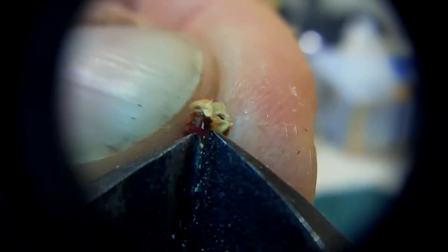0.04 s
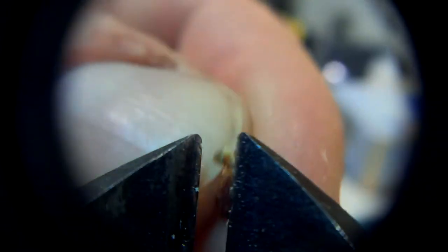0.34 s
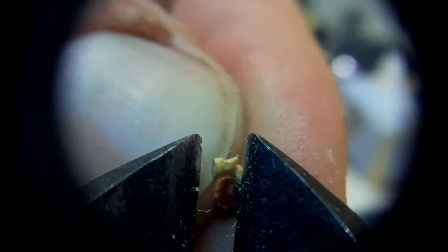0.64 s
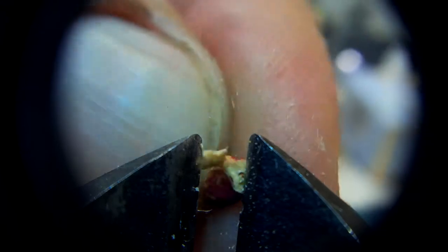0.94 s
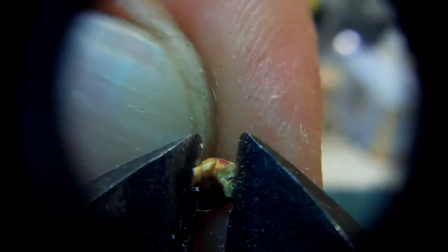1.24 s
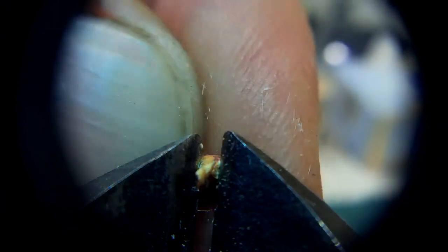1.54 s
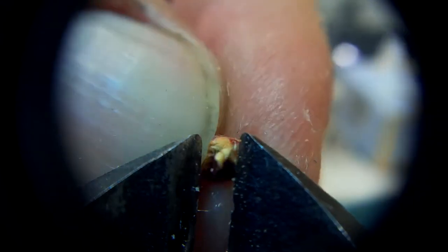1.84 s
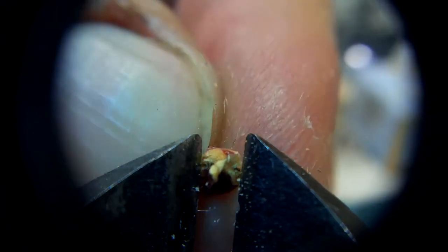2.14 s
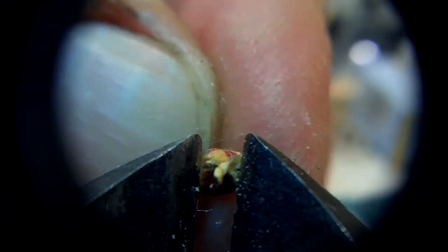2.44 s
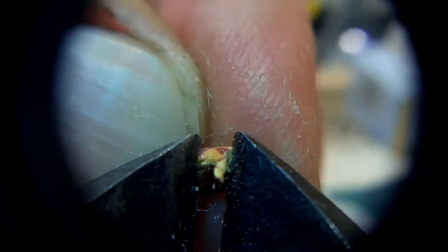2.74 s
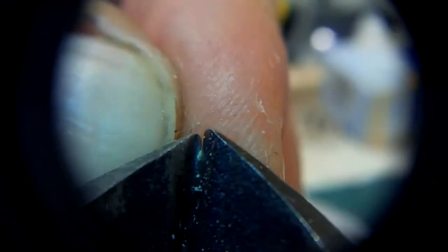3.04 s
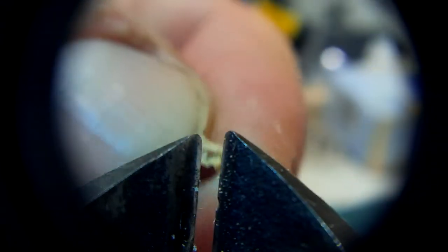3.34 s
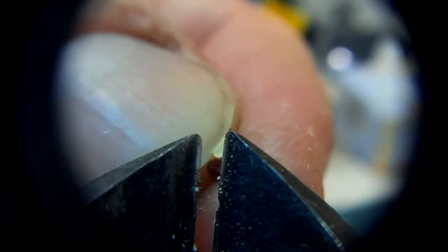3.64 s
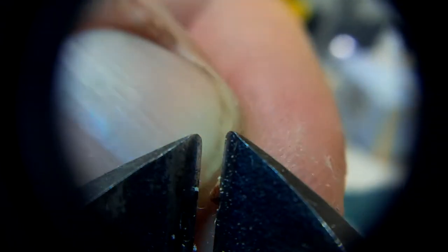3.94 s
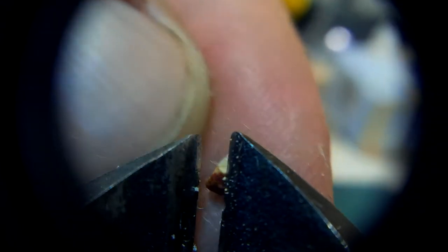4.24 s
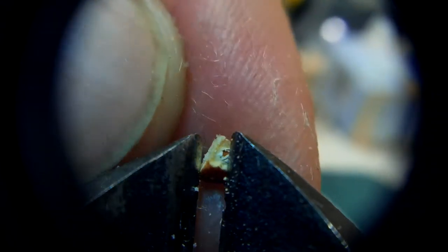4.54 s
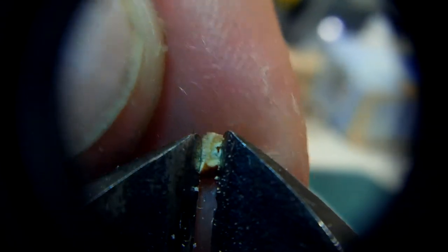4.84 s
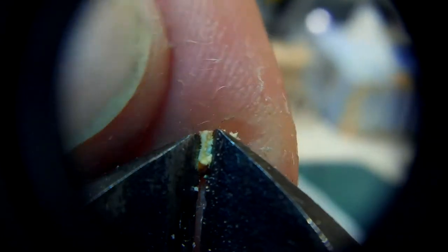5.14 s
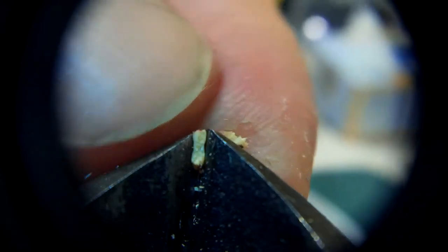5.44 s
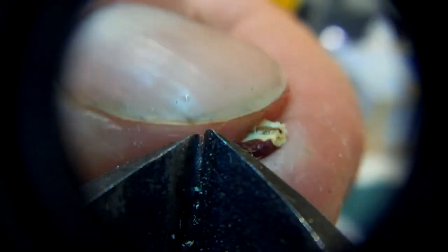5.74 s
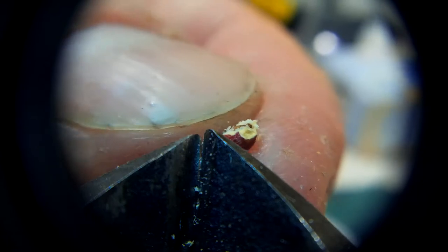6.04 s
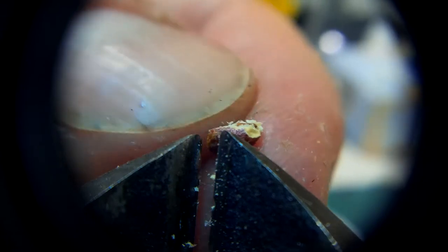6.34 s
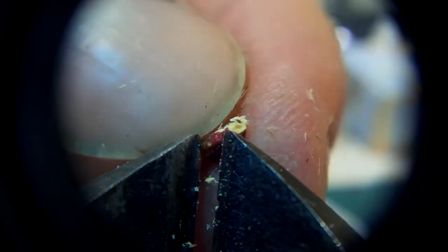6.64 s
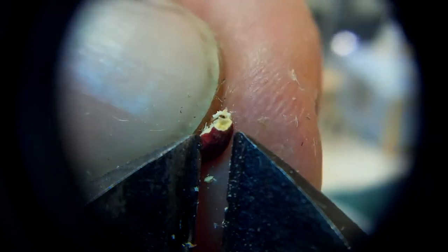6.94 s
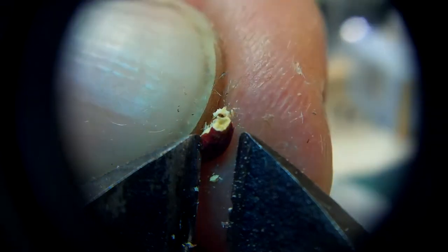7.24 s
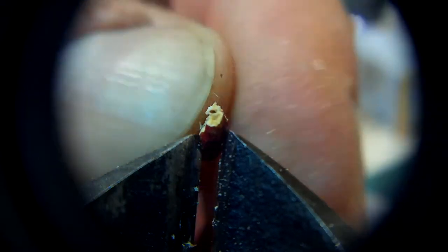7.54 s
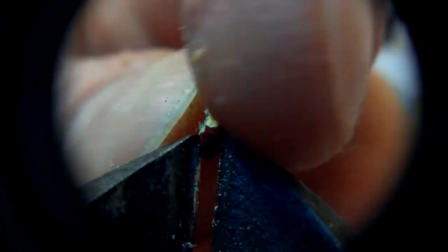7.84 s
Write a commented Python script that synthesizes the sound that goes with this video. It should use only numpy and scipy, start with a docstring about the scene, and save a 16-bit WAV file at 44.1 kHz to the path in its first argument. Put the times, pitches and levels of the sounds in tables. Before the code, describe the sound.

Small dry clicks and two sharp cracks as pliers squeeze a hard seed up close, a steady low hum underneath.

```python
"""Cracking a seed in pliers

A hard seed is cracked in steel pliers held against a small camera in a quiet room.
Each fracture of the shell rings the jaws and jolts the camera body; twice the shell gives way
and the jaws chatter. Fingers and shell scrape on the steel in between, over a steady low hum."""
import sys
import numpy as np
from scipy import signal
from scipy.fft import rfft, irfft
from scipy.io import wavfile
from scipy.ndimage import uniform_filter1d

SR = 44100
rng = np.random.default_rng(int(sys.argv[2]) if len(sys.argv) > 2 else 0)


def generate_wav(sig):
    """Save sig (samples, or channels by samples) to the path in sys.argv[1] as 16-bit PCM at SR."""
    pcm = np.round(np.clip(np.atleast_2d(sig).T, -1, 1) * 32767).astype(np.int16)
    wavfile.write(sys.argv[1], SR, pcm)


N = 355887
RING_TIME = np.arange(8192) / SR  # seconds since a hit

# single clicks of seed and jaws: (time [s], level [dB], shell pitch [Hz], bluntness [0-1],
# ring time [ratio], jolt level [dB], jolt swell [ms])
CLICKS = [ (0.165, -53, 1490, 0.9, .46, -41, 4.0), (0.5232, -46.5, 2340, 0.2, 1.6, -47, 2.6),
          (0.8992, -29, 2500, .2, 1.1, -51, 4.5), (1.6555, -31.5, 1880, 1, .8, -33.5, 2.4),
          (1.660, -43.5, 710, 1, 0.99, -60, 4), (2.8492, -27, 3380, 0.3, 1.03, -40, 3),
          (2.8572, -20, 2900, .1, 0.61, -21, 2.7), (3.011, -43.5, 1590, .15, 0.06, -67, 3),
          (3.0586, -33.5, 1750, 0.3, 0.67, -35.5, 6.7), (3.095, -47, 1770, 0, .3, -45.5, 8.8),
          (4.2165, -43, 2000, 0.3, 1.3, -43, 2.6), (5.049, -21, 2925, 0, .62, -31, 8.2),
          (6.5997, -50.5, 2100, 0, .6, -56, 4), (6.8028, -33, 2220, 0.02, 1.42, -46, 3.0),
          (7.333, -51, 2300, 0.16, 0.46, -56.5, 3), (7.5238, -48.5, 2070, 0.25, 1.14, -42, 4.8),
          (7.9668, -22.5, 2400, 0.08, 1.08, -30, 2.9)]
# the shell gives way: (time [s], first fracture [dB], tearing time [ms], fade per fracture [dB],
# shell pitch [Hz], jaw chatter [dB], thud [dB])
BIG_CRACKS = [(2.8603, -9, 12.2, 0.77, 3000, -18, -12), (5.1817, -0.5, 7.0, 4, 3200, -8, -10)]


def undb(db):
    """Decibels to gain."""
    return 10 ** (np.asarray(db) / 20)


def unit(x):
    """Scale to rms 1."""
    return x / np.sqrt(np.mean(x ** 2))


def add(track, start_s, sound):
    """Mix a sound into a track."""
    i = max(int(start_s * SR), 0)
    track[i:i + len(sound)] += sound[:max(N - i, 0)]


def colour(x, points):
    """EQ along a curve of (frequency [Hz], gain [dB]) points."""
    hz, db = np.transpose(points)
    f = np.maximum(np.fft.rfftfreq(len(x), 1 / SR), 1)
    return irfft(rfft(x) * undb(np.interp(np.log(f), np.log(hz), db)), len(x))


def resonate(x, hz, q):
    """One resonance, gain 1 at its centre."""
    return signal.lfilter(*signal.iirpeak(hz, q, fs=SR), x)


def drift(rate):
    """Smooth random modulation of rms 1 that turns about rate times a second."""
    hold = int(SR / rate)
    steps = np.repeat(rng.standard_normal(N // hold + 1), hold)
    return unit(uniform_filter1d(steps, hold)[:N])


def swell(age):
    """Envelope that rises to 1 at age 1, then dies away."""
    return age * np.exp(1 - age)


def appliance_hum(pitch_waver=0.0039, flutter_db=2.37):
    """A running appliance hums, wavering slightly in pitch and level."""
    # tones of the hum: (frequency [Hz], rms level [dB])
    tones = [(279.9, -67), (565.2, -79), (726.7, -87.5), (845.2, -90.5), (1405, -97.5), (1685, -93.5),
             (2250, -86.5), (2353, -93.5)]
    clock = np.cumsum(1 + pitch_waver * drift(6)) / SR
    hum = np.zeros(N)
    for hz, db in tones:
        hum += undb(db + flutter_db * drift(11)) * np.sin(2 * np.pi * (hz * clock + rng.random()))
    return np.sqrt(2) * hum


def noise_bed(level_db=-63):
    """Steady room rumble and microphone hiss."""
    # noise spectrum: (frequency [Hz], relative level [dB])
    spectrum = [(15, 0.5), (45, -.5), (90, -4.5), (170, -11.5), (280, -9.5), (420, -18.5), (750, -23),
                (1500, -25.5), (3000, -28.5), (8000, -30), (14000, -29.5), (16000, -36)]
    return undb(level_db) * unit(colour(rng.standard_normal(N), spectrum))


def jaw_ring(ring_scale, scatter_db=3.5, detune=0.011, crack_db=-3, crack_s=0.0007):
    """One tick rings the jaws; grip and point of contact shift the modes and set their signs."""
    # modes of the pliers in the hand: (frequency [Hz], level [dB], t60 before ring_scale [s])
    jaw_modes = [ (410, -16.5, 0.041), (570, -17, 0.015), (667, -9, 0.042), (900, -7.5, .040),
                 (1400, -10.5, .018), (1690, -6.5, 0.018), (2108, -1.5, .033), (2646, -3, 0.019),
                 (3087, -4, 0.016), (3735, -8.5, 0.014), (4270, -6.5, 0.014), (4737, -8, 0.013),
                 (6349, -12.5, .016), (7200, -15, .015), (9600, -13, 0.0094), (10750, -15.5, .014),
                 (13900, -21, .010), (3250, -48.5, 0.29), (4960, -50.5, .25)]
    hz, db, t60 = np.transpose(jaw_modes)[:, :, None]
    size, shift, side = rng.standard_normal((3, len(hz), 1))
    gains = np.sign(side) * undb(db + scatter_db * size)
    tones = np.sin(2 * np.pi * hz * (1 + detune * shift) * RING_TIME)
    decays = np.exp(-np.log(1000) * RING_TIME / (t60 * ring_scale))
    # the shell itself gives a dry, broad crack
    crack = resonate(rng.standard_normal(len(RING_TIME)), hz=2800, q=1) * np.exp(-RING_TIME / crack_s)
    return np.sum(gains * tones * decays, axis=0) + undb(crack_db) * crack


def snap(shell_hz, treble_db, ring_scale, tear_ms, shell_db=7, shell_q=5.5, splinter=0.21, crest_db=7):
    """A break runs through the shell as a first tick and a fading spray of smaller ones."""
    n = len(RING_TIME)
    fade = np.exp(-1000 * RING_TIME / tear_ms)
    # a quick break is one clean tick, a slow one splinters
    ticks = splinter * tear_ms * fade * rng.standard_normal(n) * rng.exponential(size=n)
    ticks[0] = 1
    hit = signal.fftconvolve(ticks, jaw_ring(ring_scale))[:n]
    hit += undb(shell_db) * resonate(hit, shell_hz, shell_q)
    # sharper contacts carry more treble
    treble = signal.sosfiltfilt(signal.butter(2, 5500, "high", fs=SR, output="sos"), hit, padtype=None)
    hit += (undb(treble_db) - 1) * treble
    loudest_rms = np.sqrt(uniform_filter1d(hit ** 2, size=128, mode="constant").max())
    return hit / loudest_rms / undb(crest_db)


def clicks():
    """Seed and jaws click; a blunt contact loses treble and rings mostly at its own pitch."""
    out = np.zeros(N)
    for s, db, shell_hz, blunt, ring_scale, _, _ in CLICKS:
        click = snap(shell_hz, -20.5 * blunt, ring_scale, tear_ms=.5, shell_db=8 + 6 * blunt)
        add(out, s, undb(db) * click)
    return out


def jolts(body_hz=254, body_swell_ms=4.6, loose_grip_power=.16):
    """Every knock on the camera, as (time [s], level [dB], pitch [Hz], swell [ms])."""
    # fingers knock softly against the camera: (time [s], level [dB], swell [ms])
    bumps = [(1.211, -51.5, 6), (1.378, -51.5, 4.5), (1.68, -50, 4.8), (1.705, -50, 6.3),
             (1.872, -47.5, 4.1), (2.183, -43.5, 4.6), (4.262, -49, 4), (5.743, -42.5, 4.3),
             (5.801, -45.5, 5.2), (6.137, -49.5, 4), (6.539, -43, 3.9), (7.979, -38.5, 9.6),
             (8.042, -39, 7.9)]
    light = [(s, db, ms) for s, *_, db, ms in CLICKS] + list(bumps)
    # held loosely, the body rings longer and a little higher
    knocks = [(s, db, body_hz * (ms / body_swell_ms) ** loose_grip_power, ms) for s, db, ms in light]
    # a finger bump also rocks the whole camera
    rock_db, rock_hz, rock_swell_ms = -16.5, 67, 5.6
    knocks += [(s, db + rock_db, rock_hz, rock_swell_ms) for s, db, _ in bumps]
    # a big crack: the hand recoils, thuds as the jaws slam, then rebounds
    thud_hz, thud_swell_ms = 267, 4.3
    recoil_db, rebound_db, rebound_s = -14, -25, .026
    for s, _, tear_ms, *_, thud_db in BIG_CRACKS:
        slam_s = s + tear_ms / 1000
        for at_s, step_db in [(s, recoil_db), (slam_s, 0), (slam_s + rebound_s, rebound_db)]:
            knocks.append((at_s, thud_db + step_db, thud_hz, thud_swell_ms))
    return knocks


def camera_body(rattle_db=-16, rattle_ms=4.2, rattle_steepness=0.52):
    """Each jolt passes through the hand: the body swells for a cycle or two and its housing rattles."""
    # modes of the camera body: (pitch [ratio], level [dB], swell time [ratio])
    body_modes = [(.25, -16, 1.7), (1, 0, 1), (1.45, -17.5, .8)]
    # dull rattle of the housing: (frequency [Hz], relative level [dB])
    housing = [(25, 1.5), (95, 5.5), (135, -15), (300, -1), (420, 3), (550, -3), (850, -7), (1500, -8.5),
               (3000, -21.5), (8000, -43.5)]
    out = np.zeros(N)
    ms = 1000 * RING_TIME
    for s, db, hz, swell_ms in jolts():
        for multiple, mode_db, share in body_modes:
            tone = -np.sin(2 * np.pi * hz * multiple * RING_TIME)
            add(out, s, undb(db + mode_db) * swell(ms / (swell_ms * share)) * tone)
        # every jolt rattles the housing, the slowest slightly less
        trim = min(6.5 / swell_ms, 1) ** rattle_steepness
        rattle = unit(colour(rng.standard_normal(len(ms)), housing))
        add(out, s, trim * undb(db + rattle_db) * swell(ms / rattle_ms) * rattle)
    return out


def rubbing(slips_per_s=2200, spread_db=3.0, dull_hz=4500, squeak_db=-6, body_q=2.1, rock_db=-5):
    """Dense tiny slips tick the jaws while dragging skin shakes the body; each stroke hits a new spot."""
    # fingers and shell slide on the jaws:
    # (midpoint [s], length [s], scrape [dB], rumble [dB], rumble pitch [Hz])
    strokes = [ (0.363, 0.064, -72.5, -69, 260), (0.583, 0.09, -74, -65, 300), (1.285, .12, -68, -60, 260),
               (1.39, .14, -74.5, -59.5, 248), (1.755, 0.22, -73.5, -60, 257),
               (1.9, 0.065, -66, -57.5, 249), (2.12, 0.33, -77, -64.5, 246),
               (2.629, 0.061, -70.5, -63, 274), (2.969, 0.084, -67, -59, 272),
               (3.119, 0.092, -75, -56, 263), (4.12, 0.15, -64, -64.5, 256), (4.193, 0.074, -57, -59, 275),
               (4.346, .04, -58.5, -56, 260), (4.809, 0.06, -59, -63, 262), (5.097, .06, -63.5, -62, 288),
               (5.641, 0.46, -75, -63, 263), (6.60, 0.086, -68, -55.5, 255.8),
               (7.526, 1, -79.5, -68.5, 342), (7.581, 0.13, -67, -54.5, 277.5),
               (8.039, 0.062, -67.5, -55, 276)]
    out = np.zeros(N)
    for s, length, scrape_db, rumble_db, rumble_hz in strokes:
        n = int(length * SR)
        envelope = np.sqrt(np.abs(np.hanning(n)))
        slipping = rng.random(SR)[:n] < slips_per_s / SR
        size, skin = rng.standard_normal((2, SR))[:, :n]
        slips = slipping * size * undb(spread_db * np.abs(size))
        steel = signal.fftconvolve(slips, jaw_ring(ring_scale=0.65))[:n]
        steel = signal.sosfilt(signal.butter(2, dull_hz, fs=SR, output="sos"), steel)
        # friction feeds the jaws' main mode most
        steel += undb(squeak_db) * resonate(steel, hz=2160, q=7)
        rumble = unit(resonate(resonate(skin, rumble_hz, body_q), rumble_hz, body_q))
        # the dragging hand also rocks the whole camera
        rocking = undb(rock_db) * unit(resonate(resonate(skin, hz=74, q=3.2), hz=74, q=3.2))
        stroke = undb(scrape_db) * unit(steel) + undb(rumble_db) * unit(rumble + rocking)
        add(out, s - length / 2, envelope * stroke)
    return out


def crunches():
    """Fibres of the shell tear slowly under the jaws, soft and dull."""
    # slow tears: (time [s], level [dB], tearing time [ms])
    tears = [(1.266, -49, 6.6), (1.301, -49, 5.7), (1.347, -54.5, 1.7), (1.376, -54, 1.5),
             (1.665, -48.5, 11), (4.811, -47.5, 3.9)]
    out = np.zeros(N)
    for s, db, tear_ms in tears:
        add(out, s, undb(db) * snap(shell_hz=2640, treble_db=-28, ring_scale=0.74, tear_ms=tear_ms))
    return out


def big_crack(start_s, db, tear_ms, fade_db, shell_hz, chatter_db, fractures=4):
    """A run of fractures splits the shell; then the freed jaws slam and bounce, weaker each time."""
    bounces, bounce_s, bounce_fade_db = 5, 0.0037, 2.5
    out = np.zeros(N)
    tear_s = tear_ms / 1000
    for k in range(fractures):
        piece = snap(shell_hz, treble_db=1, ring_scale=.42, tear_ms=1.25, shell_q=3.7)
        add(out, start_s + tear_s * k / fractures, undb(db - k * fade_db) * piece)
    slam_treble_db = 3.5 + .6 * chatter_db  # a harder slam is brighter
    for k in range(bounces):
        bounce = snap(shell_hz=1400, treble_db=slam_treble_db, ring_scale=0.34, tear_ms=1.3)
        bounce += undb(3) * resonate(bounce, hz=9100, q=7)  # the steel edges ping as they meet
        add(out, start_s + tear_s + k * bounce_s, undb(chatter_db - k * bounce_fade_db) * bounce)
    handle_knock = undb(5) * resonate(out, hz=405, q=4.8)  # hollow, under the sudden load
    return out + handle_knock


def room(x, wet_db=-42.0, t60=.26, predelay_s=0.018):
    """Faint, late reflections from a small furnished room."""
    # tone of the reverb: (frequency [Hz], relative level [dB])
    reverb_eq = [(60, -2.5), (300, -1.5), (900, -5.5), (1700, 1.5), (2200, -6), (3100, -1), (4000, -2.5),
                 (7000, 3.5), (10000, -2), (16000, -10)]
    t = np.arange(SR // 2) / SR
    decay = np.exp(-np.log(1000) * t / t60) * (t > predelay_s)
    tail = colour(rng.standard_normal(len(t)), reverb_eq) * decay
    return undb(wet_db) * signal.fftconvolve(x, tail / np.sqrt(np.sum(tail ** 2)))[:N]


def scene():
    """The pliers right at the microphone, the room far behind."""
    # dips near 135 Hz and 1.1 kHz that colour all the close sounds: (frequency [Hz], Q, depth [0-1])
    notches = [(135, 2.4, .55), (1098.6, 3.8, .45)]
    shell = sum(big_crack(*crack) for *crack, _ in BIG_CRACKS) + clicks() + crunches()
    flakes = undb(-5) * resonate(shell, hz=4520, q=11)  # small flakes ring above the main piece
    near = shell + flakes + camera_body() + rubbing()
    for hz, q, depth in notches:
        near -= depth * resonate(near, hz, q)
    return (near + room(near) + appliance_hum() + noise_bed())[None]


def record(dry, ceiling=.72, top_hz=16000):
    """The microphone overloads on the loudest crack; the top end is cut."""
    clipped = np.clip(dry, -ceiling, ceiling)
    return signal.sosfilt(signal.ellip(8, .2, 70, top_hz, fs=SR, output="sos"), clipped)


dry = scene()
out = record(dry)
generate_wav(out)
```